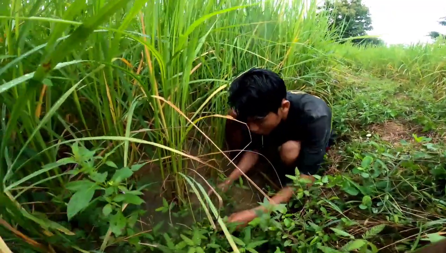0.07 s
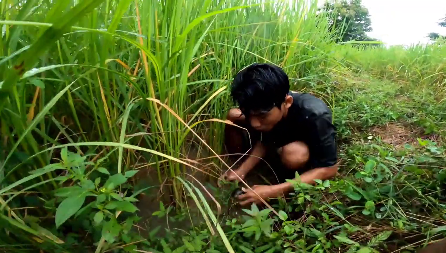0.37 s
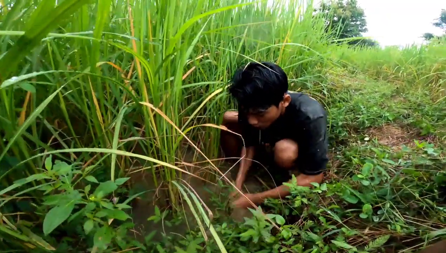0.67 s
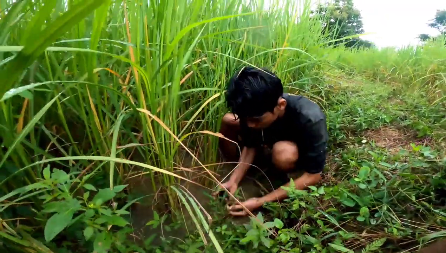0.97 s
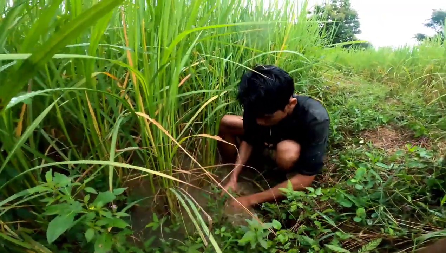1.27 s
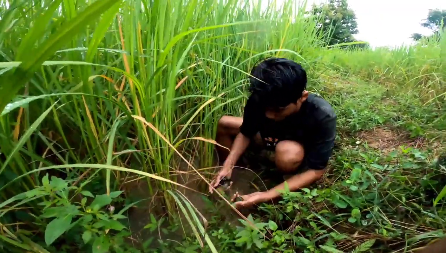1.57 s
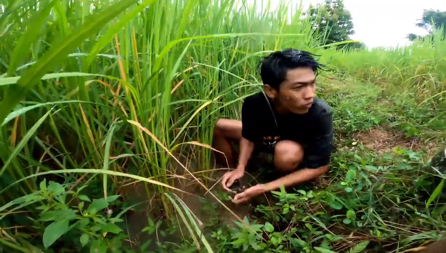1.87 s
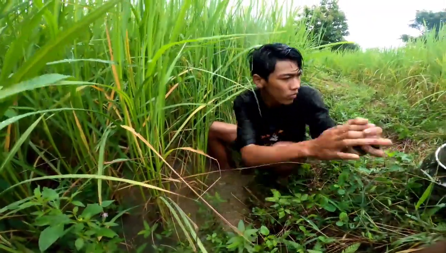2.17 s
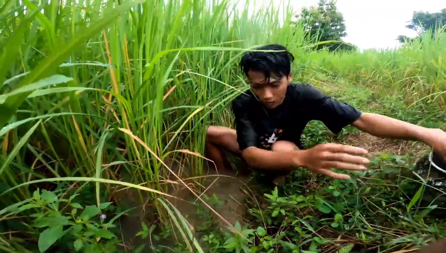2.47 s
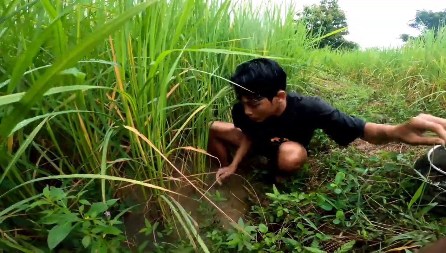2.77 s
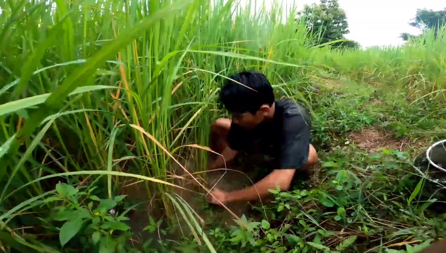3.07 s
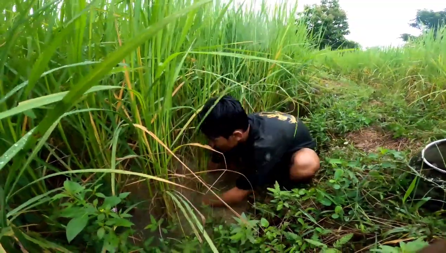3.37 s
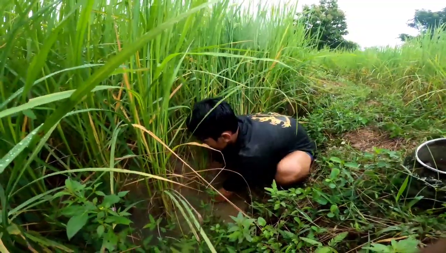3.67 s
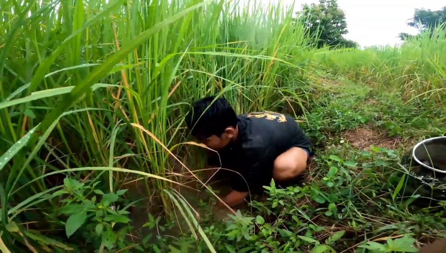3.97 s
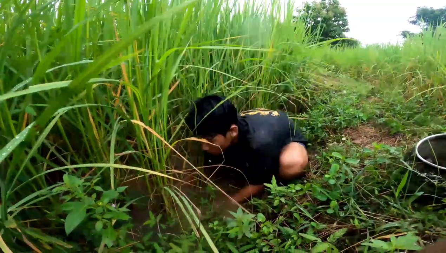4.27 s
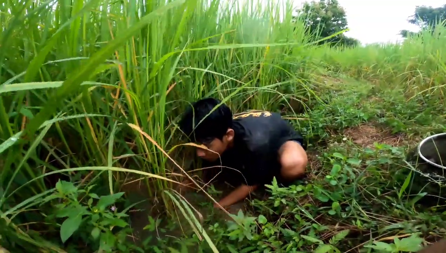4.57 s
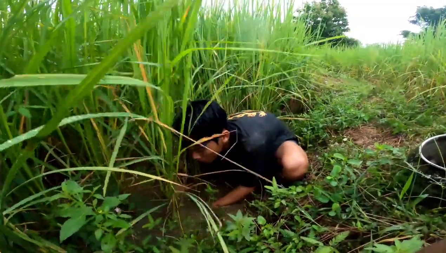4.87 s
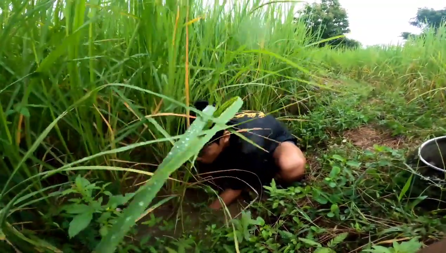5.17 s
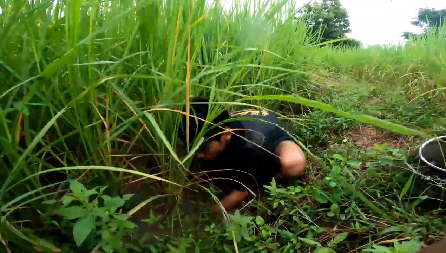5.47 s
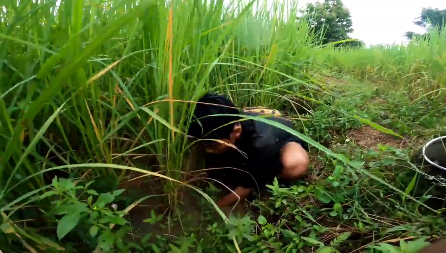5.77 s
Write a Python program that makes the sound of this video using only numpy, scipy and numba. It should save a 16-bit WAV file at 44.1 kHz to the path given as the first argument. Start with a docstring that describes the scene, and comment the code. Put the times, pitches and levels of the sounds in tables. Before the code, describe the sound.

Wet splashes and gurgles of hands groping in a shallow ditch, with a brief tumble in a plastic bucket and soft brushing leaves.

```python
"""Groping in a rice-field ditch

Hands slosh, drip and smack in muddy water, ringing the bubbles they trap; a trickle runs in on the left.
A hard little catch hits the wall of a plastic bucket, then tumbles and rolls on its drumming base.
Rice leaves brush and hiss close by, over a faint far drone and low puffs of breeze."""
import sys
import numpy as np
from scipy import signal
from scipy.fft import rfft, irfft
from scipy.io import wavfile
from numba import njit

SR = 44100
rng = np.random.default_rng(int(sys.argv[2]) if len(sys.argv) > 2 else 0)


def persist_wave(psi):
    """Save psi, clipped to +-1, as 16-bit WAV."""
    counts = np.round(np.clip(psi, -1, 1) * 32767).astype(np.int16)
    wavfile.write(sys.argv[1], SR, np.atleast_2d(counts).T)


N = 261513

# EQ of the trickling water. Each row: frequency in Hz, gain in dB.
STREAM_EQ = [(250, -6), (450, -9), (700, -1.5), (900, -2), (1280, 7.5), (1600, 1), (2500, 1.5),
             (4000, -0.5), (4700, -5), (8000, -17), (14000, -20)]
# Hands stir the water. Each row: start and length in seconds, level in dB, middle bubble pitch in Hz.
HAND_PUSHES = [(0.112, 0.014, -39.5, 1485), (0.238, 0.0066, -42.5, 850), (0.46, 0.06, -36.5, 2075),
               (0.64, 0.012, -38, 713), (0.644, 0.016, -29, 3220), (0.682, 0.052, -30.5, 1234),
               (0.74, 0.039, -25, 1457), (0.854, 0.022, -37.5, 880), (0.942, 0.21, -42.5, 2250),
               (1.395, 0.042, -32, 3500), (1.451, 0.037, -30.5, 1624), (1.497, 0.032, -29, 1415),
               (1.538, 0.063, -34, 2030), (1.681, 0.044, -40, 1790), (2.17, 0.4, -41, 996),
               (3.072, 0.032, -39.5, 2160), (3.183, 0.028, -32, 1985), (3.389, 0.035, -36.5, 2170),
               (4.664, 0.036, -43, 597)]
# The bucket's modes. Each row: pitch in Hz, level in dB when struck on the base, and on the wall.
BUCKET_MODES = [(341, -12, -4.5), (642, -5.5, -24), (963, 0.5, -9.5), (1002, -1.5, -18), (1405, -20, 1.5),
                (1520, -5, -16), (1773, 2, -19), (1948, 4, -7), (2226, -9, 2.5), (2380, -2, -0.5),
                (2620, -25, -6), (2930, -6, -22), (3470, -18, 6), (3716, -1, 3.5), (5160, -9, 5.5),
                (7070, -38, 3)]
# EQ of shell cracking against plastic. Each row: frequency in Hz, gain in dB.
CRACK_EQ = [(150, -14.5), (400, -0.5), (800, -4.5), (1400, -4), (3700, 5), (4500, -14), (5400, -8.5),
            (9000, -14.5), (11000, -23.5), (15000, -42)]


def undb(db):
    """Decibels to gain."""
    return 10 ** (np.asarray(db) / 20)


def unit(x):
    """Scale to rms 1."""
    return x / np.sqrt(np.mean(x ** 2) + 1e-18)


def curve(rows):
    """Gain at every sample from (s, dB) rows."""
    return undb(np.interp(np.arange(N) / SR, *np.transpose(rows)))


def swells(rows):
    """Gain at every sample from bell-shaped swells (peak time s, half length s, dB)."""
    t = np.arange(N) / SR
    return sum(undb(db) * np.exp(-((t - s) / half) ** 2) for s, half, db in rows)


def walk(rate):
    """Random drift with a spread near 1, turning rate times a second."""
    return np.interp(np.arange(N) / SR * rate, np.arange(N), rng.standard_normal(N))


def add(out, s, x):
    """Mix x into out from time s on."""
    i = max(int(s * SR), 0)
    out[..., i:i + x.shape[-1]] += x[..., :max(N - i, 0)]


def eq(x, points, size=2048):
    """Minimum-phase EQ through (Hz, dB) points."""
    hz, db = np.transpose(points)
    log_hz = np.log(np.fft.rfftfreq(size, 1 / SR) + 1)
    log_gain = np.log(undb(np.interp(log_hz, np.log(hz), db)))
    cepstrum = irfft(log_gain)[:size // 2]
    cepstrum[1:] *= 2
    response = irfft(np.exp(rfft(cepstrum, size))).reshape((1,) * (x.ndim - 1) + (-1,))
    return signal.fftconvolve(x, response, axes=-1)[..., :x.shape[-1]]


def lowpass(x, hz, order=1):
    """Gentle treble cut."""
    return signal.sosfilt(signal.butter(order, min(hz, SR / 2 - 100), fs=SR, output="sos"), x)


@njit
def bubbles(length, start, hz, cycles, size, rise):
    """Ringing bubbles; each dies away over its cycles while its pitch climbs by the fraction rise."""
    out = np.zeros(length)
    for k in range(len(start)):
        n, first, phase = int(cycles[k] / hz[k] * SR) + 2, int(start[k] * SR), 0.
        for i in range(min(n, length - first)):
            age = i / n
            phase += 2 * np.pi * hz[k] * (1 + rise * age) / SR
            out[first + i] += size[k] * np.sin(phase) * np.exp(-5 * age) * (1 - np.exp(-25 * age))
    return out


def ragged(hz, rough, flutter_hz):
    """A tone along a pitch curve, fluttering in strength and phase."""
    t = np.arange(len(hz)) / SR
    wobble, smear = (np.interp(t * flutter_hz, np.arange(200), row)
                     for row in rng.standard_normal((2, 200)))
    phase = 2 * np.pi * np.cumsum(hz) / SR
    tone = (1 + rough * wobble) * np.sin(phase) + rough * smear * np.cos(phase)
    return tone / np.sqrt(1 + rough ** 2)


def plip(hz, t60, ring_db, spray_db):
    """One wet impact: a rising ring and a burst of bright spray that die together."""
    t = np.arange(SR // 12) / SR
    ring = undb(ring_db) * np.sin(2 * np.pi * hz * t * (1 + 6 * t))
    spray = undb(spray_db) * rng.standard_normal(len(t))
    envelope = undb(-60 * t / t60) * (1 - np.exp(-t / 0.00022))
    return envelope * (ring + spray - lowpass(spray, hz / 2))


def place(x, left_db, lag_ms, scatter_db, scatter_t60, blur_hz):
    """Pan the treble, delay the left by lag_ms and add bright scatter off bank and stalks."""
    hz = np.fft.rfftfreq(N + SR, 1 / SR)
    t = np.arange(SR // 8) / SR
    tail = rng.standard_normal((2, len(t))) * undb(-60 * t / scatter_t60) * (t > .001)
    scatter = rfft(unit(tail), N + SR) / np.sqrt(len(t)) * undb(scatter_db) * hz / np.hypot(hz, blur_hz)
    direct = np.exp(-2j * np.pi * hz * np.array([[lag_ms / 1000], [0]]))
    shade = undb(np.array([[left_db], [-left_db]]) / 2 * hz / np.hypot(hz, 700))
    return irfft(rfft(x, N + SR) * (direct + scatter) * shade, N + SR)[:, :N]


def air():
    """A far, throbbing drone and rumbling puffs of breeze."""
    # EQ of the far rumble. Each row: frequency in Hz, gain in dB.
    far_eq = [(15, -12), (45, 1), (80, -0.5), (115, 1), (150, -1), (200, 2), (280, -9), (500, -5),
              (1200, -42)]
    # Puffs of breeze. Each row: peak time and half length in seconds, level in dB.
    puffs = [(4.58, 0.093, -43), (5.722, 0.21, -48)]
    t = np.arange(N) / SR
    rumble = eq(rng.standard_normal(N) + 0.29 * rng.standard_normal((2, N)), far_eq)
    drone = np.sin(2 * np.pi * 149 * t + 1.5 * walk(30))
    throb = 1 + 0.54 * np.sin(2 * np.pi * 21 * t + 2.0 * walk(5.5))
    breeze = unit(lowpass(rng.standard_normal(N) + 0.33 * rng.standard_normal((2, N)), 41, order=2))
    return (undb(-54) * unit(rumble) + undb(-54.5) * drone) * throb + breeze * swells(puffs)


def leaves(count=150, rest_db=-50):
    """Rice blades brush each other on both sides: a fine hiss, and crisp ticks that grow with it."""
    # EQ of the hiss. Each row: frequency in Hz, gain in dB.
    leaf_eq = [(400, -11.5), (1500, -1), (3500, 1), (6000, -2), (9000, -5.5), (10500, -10), (13000, -11.5),
               (15500, -39)]
    # An arm sweeps through the blades. Each row: peak time and half length in seconds, level in dB.
    swishes = [(2.42, 0.16, -51.5), (3.5, 0.21, -49), (4.45, 0.22, -51), (5.05, 0.41, -48),
               (5.85, 0.53, -54.5)]
    grain = rng.standard_normal((2, N)) * undb(4.1 * rng.standard_normal((2, N)))
    hiss = unit(eq(grain, leaf_eq)) * undb(1.74 * walk(35))
    when, pitch, size, side = rng.random((count, 4)).T
    hz = 2200 * 2 ** (2.5 * pitch)
    gain = undb(5 + 19 * size ** 3 - 6 * pitch)
    ticks = [bubbles(N, when * N / SR, hz, 4 + 4 * pitch, gain * np.sqrt(share), rise=0.)
             for share in (side, 1 - side)]
    return (hiss + np.array(ticks)) * (undb(rest_db) + swells(swishes))


def fizz(count=14000):
    """A soft wash of tiny, short-lived bubbles."""
    when, life, pitch, size = rng.random((count, 4)).T
    hz = 560 * 2 ** (4.3 * pitch)
    gain = undb(-2.4 * np.log(size + .01)) * 2 ** (2.4 * pitch)
    return unit(eq(bubbles(N, when * N / SR, hz, 7 + 20 * life, gain, rise=0.13), STREAM_EQ))


def trickle(count=260):
    """Water runs in on the left in small gulps: gliding bubbles over fizz, with wide, bright spatter."""
    # The flow swells and ebbs. Each row: time in seconds, level in dB.
    flow = [(0.0, -42), (0.86, -40), (1.2, -42.5), (1.52, -38), (1.91, -41.5), (2.5, -40.5),
            (2.95, -44), (3.44, -41.5), (3.83, -42), (5.02, -40.5), (5.37, -43), (5.93, -38.5)]
    when, life, pitch, size = rng.random((count, 4)).T
    hz = 430 * 2 ** (3 * pitch)
    gain = undb(9 * size ** 2 + 5 * pitch)
    babble = bubbles(N, when * N / SR, hz, 20 + 30 * life, gain, rise=0.3)
    water = undb(-9) * unit(eq(babble, STREAM_EQ)) + undb(-3) * fizz()
    wide_fizz = np.array([fizz(), fizz()])
    spatter = undb(-6.5) * (wide_fizz - lowpass(wide_fizz, 1530))
    pan = undb([[3.6], [-3.6]])
    return (water + spatter) * pan * curve(flow) * undb(1.4 * walk(30))


def gurgles():
    """Large bubbles swell and break up, each on its own wandering glide; soft mud makes them flutter."""
    # Surfacing bubbles. Each row: start in seconds, level in dB, starting pitch in Hz,
    # length of the main swell in seconds, glide in octaves per second.
    glugs = [(.007, -32, 843, 0.052, 5.5), (0.036, -29.5, 1138, 0.037, -2), (0.522, -37, 413, 0.055, 12),
             (1.363, -28.5, 1245, 0.015, -2.5), (1.444, -23.5, 1348, 0.037, 6),
             (1.472, -26.5, 467, 0.018, 5.5), (1.508, -31, 471, 0.023, 6.5), (1.777, -37.5, 391, 0.064, 6),
             (2.193, -36.5, 481, 0.045, 10), (2.399, -29.5, 1153, 0.027, 12),
             (2.478, -38.5, 558, 0.045, -12), (2.515, -34.5, 487, 0.073, 9),
             (3.0796, -23.5, 1137, 0.02, 9.5), (3.176, -34.5, 372, 0.02, 13), (3.507, -36.5, 663, 0.022, 8),
             (4.284, -37, 824, 0.029, 14), (4.311, -29.5, 1154, 0.013, 18), (4.502, -38, 1140, 0.034, 10.5),
             (4.868, -30.5, 1275, 0.011, -3), (5.044, -31.5, 1126, 0.016, 3), (5.254, -35, 697, 0.022, 9.5),
             (5.317, -31, 1238, 0.018, -5), (5.484, -36, 1130, 0.021, -8.5), (5.409, -35.5, 1090, 0.026, 6),
             (5.479, -40, 455, 0.031, 10), (5.612, -34, 498, 0.022, 9.5), (5.899, -29.5, 1320, 0.008, 6)]
    out = np.zeros(N)
    for s, db, hz, length, glide in glugs:
        t = np.arange(int(2 * length * SR)) / SR
        age = t / length / 0.3
        swell = age * np.exp(1 - age)
        wander = .07 * walk(110)[:len(t)]
        add(out, s, undb(db) * swell * ragged(hz * 2 ** (glide * t + wander), rough=.5, flutter_hz=200))
    return out


def crackles(count=6, spread_s=0.0067):
    """Wet stalks and mud crackle under the fingers, each time in a quick handful of ticks."""
    # Clusters of ticks. Each row: start in seconds, level in dB.
    clusters = [(3.405, -26.5), (4.283, -27), (4.43, -27.5), (4.453, -29), (4.903, -27), (5.16, -28.5),
                (5.184, -28), (5.198, -28), (5.292, -28.5), (5.781, -30)]
    s, db = np.transpose(clusters)[:, :, None]
    when, pitch, size = rng.random((len(s), count, 3)).transpose(2, 0, 1)
    start = s + when * spread_s
    hz = 1700 * 2 ** (1.3 * pitch)
    gain = undb(db) * (.5 + size)
    return bubbles(N, start.ravel(), hz.ravel(), 8 + 10 * size.ravel(), gain.ravel(), rise=0.)


def plunges(overtone_ratio=2.8):
    """The air pocket behind a plunging hand gulps down in pitch as it deepens, on two resonances."""
    # Air pockets. Each row: start and length in seconds, level in dB, first and last pitch in Hz.
    pockets = [(1.41, .085, -34.5, 1595, 477.3)]
    out = np.zeros(N)
    for s, length, db, first_hz, last_hz in pockets:
        n = int(length * SR)
        depth = np.linspace(0, 1, n)
        hz = first_hz * (last_hz / first_hz) ** depth * 2 ** (.13 * walk(90)[:n])
        gulp = ragged(hz, rough=1.6, flutter_hz=450)
        overtone = undb(-5) * ragged(hz * overtone_ratio, rough=2, flutter_hz=700)
        jerks = unit(undb(4.5 * walk(160)[:n]))
        add(out, s, undb(db) * signal.windows.tukey(n, .15) * jerks * (gulp + overtone))
    return out


def sloshes(bubbles_per_s=2400):
    """Each push of a hand traps separate bubbles, more the longer it lasts, and throws fine spray."""
    out = np.zeros(N)
    for s, length, db, middle_hz in HAND_PUSHES:
        t = np.arange(int((length + 0.02) * SR)) / SR
        count = 10 + int(length * bubbles_per_s)
        when, life = rng.random((SR // 20, 2))[:count].T
        pitch, size = rng.standard_normal((SR // 20, 2))[:count].T
        hz = np.clip(middle_hz * 2 ** (.8 * pitch), 200, 13000)
        gain = undb(7.3 * np.minimum(size, 1.7)) * (hz / middle_hz) ** -.05 * (hz > 400)
        cloud = bubbles(len(t), when * length, hz, 6 + 20 * life, gain, rise=0.24)
        spray = rng.standard_normal(SR)[:len(t)] * np.exp(-np.maximum(t - length, 0) / 0.01)
        level = undb(db) * np.sqrt(len(t) / SR / length)
        add(out, s, level * (unit(cloud) + undb(-8.5) * unit(spray)))
    return out


def droplets(count=4):
    """Each slosh flings a few fine droplets, which land with crisp ticks."""
    s, length, db, _ = np.transpose(HAND_PUSHES)[:, :, None]
    when, pitch, size = rng.random((len(s), count, 3)).transpose(2, 0, 1)
    start = s + when * (length + .025)
    hz = 6000 + 8000 * pitch
    gain = undb(db + 10.5 + 17 * size ** 2)
    return bubbles(N, start.ravel(), hz.ravel(), 3 + 4 * size.ravel(), gain.ravel(), rise=0.)


def drops():
    """Drops fall from the hands; each smacks the surface and rings one small bubble."""
    # Drips. Each row: start in seconds, level in dB, starting pitch in Hz, 60 dB decay in seconds.
    drips = [(0.105, -26, 3800, 0.017), (0.6323, -14, 2470, 0.0089), (0.6493, -13, 3750, 0.011),
             (0.6666, -14, 1320, 0.021), (0.681, -16, 950, 0.016), (0.7255, -14.5, 3630, 0.0089),
             (0.747, -14, 710, 0.023), (0.768, -16, 1280, 0.023), (0.8587, -23, 3480, 0.02),
             (0.989, -22, 1370, 0.05), (1.3948, -10, 2670, 0.01), (1.4606, -20, 2250, 0.022),
             (1.9737, -6, 3260, 0.0029), (2.077, -23.5, 2600, 0.012), (2.1082, -17.5, 2550, 0.015),
             (2.109, -15.5, 1410, 0.011), (2.158, -22, 1320, 0.014), (2.183, -13.5, 2330, 0.008),
             (2.1835, -19.5, 1600, 0.016), (2.2509, -14, 2400, 0.0063), (2.358, -19, 915, 0.037),
             (3.3247, -21.5, 1420, 0.018), (3.586, -12.5, 1670, 0.0029), (4.151, -21.5, 3220, 0.0074),
             (4.704, -20, 1220, 0.007), (4.8545, -20, 1200, 0.014), (5.581, -26.5, 3970, 0.013)]
    out = np.zeros(N)
    for s, db, hz, t60 in drips:
        add(out, s, undb(db) * plip(hz, t60, ring_db=4, spray_db=-10))
    return out


def smacks():
    """Wet mud snaps as it lets go of the fingers: mostly spray, with little ring."""
    # The mud lets go. Each row: start in seconds, level in dB.
    releases = [(0.6318, -7), (0.8252, -19), (0.876, -13.5), (0.944, -21.5), (1.3943, -11.5), (1.5187, -17),
                (1.9718, -21.5), (2.2473, -15.5), (3.1843, -17.5), (3.207, -16.5), (4.787, -31)]
    out = np.zeros(N)
    for s, db in releases:
        add(out, s, undb(db) * plip(hz=2460, t60=0.013, ring_db=-16, spray_db=3))
    return out


def roll(start_s=2.745, stop_s=2.89, attack_s=0.12, release_t60=0.031, knocks_per_s=900):
    """The rolling shell keeps the base ringing with tiny knocks; its weight damps the high modes."""
    t = np.arange(SR // 10) / SR
    ring = sum((-1) ** k * undb(db - 60 * t / min(.06, 80 / hz)) * np.sin(2 * np.pi * hz * t)
               for k, (hz, db, _) in enumerate(BUCKET_MODES))
    knocks = rng.standard_normal(N) * (rng.random(N) < knocks_per_s / SR)
    body = unit(lowpass(signal.fftconvolve(knocks, ring)[:N], 4100, order=2))
    scuff = unit(lowpass(eq(knocks, CRACK_EQ), 2260))
    now = np.arange(N) / SR
    attack = np.clip((now - start_s) / attack_s, 0, 1)
    release = undb(-60 * np.maximum(now - stop_s, 0) / release_t60)
    return undb(-29.5) * (.6 * body + scuff) * attack * release


def bucket_ring(t, wall):
    """Plastic damps high modes fast; on the base the catch loads them, differently at every touch."""
    hz, base_db, wall_db = np.transpose(BUCKET_MODES)[:, :, None]
    jitter, detune, polarity = rng.standard_normal((3, len(BUCKET_MODES), 1))
    base = 1 - wall
    t60 = np.minimum(.17, .135 * np.sqrt(1400 / hz)) * np.minimum(1, 1400 / hz) ** (.8 * base)
    pitch = hz * (1 + .04 * base * np.minimum(1, hz / 2600) * detune)
    modes_db = base_db + wall * (wall_db - base_db) + 3 * base * jitter - 60 * t / t60
    return np.sum(np.sign(polarity) * undb(modes_db) * np.sin(2 * np.pi * pitch * t), axis=0)


def chatter(t, touch_t60=0.0087, tail_t60=0.099):
    """The catch touches several times in one bounce: a stuttering crack with a short tail."""
    # Contacts. Each row: delay after the first touch in seconds, level in dB.
    touches = [(0, 4), (.0022, -4), (.0065, -21), (0.011, -22)]
    bursts = sum((t >= lag) * undb(db - 60 * np.abs(t - lag) / touch_t60) for lag, db in touches)
    tail = undb(-8.5 - 60 * t / tail_t60)
    return eq(rng.standard_normal(len(t)) * (bursts + tail), CRACK_EQ)


def base_thud(t, attack_s=0.0071):
    """The flexing base drums with a wavering pitch, and the air in the bucket hums on."""
    # Low resonances. Each row: pitch in Hz, 60 dB decay in seconds, level in dB.
    drum_modes = [(330, 0.05, -7), (375.5, 0.031, 2), (355, 0.11, -9)]
    bent_time = np.cumsum(1 + .035 * walk(70)[:len(t)]) / SR
    drum = sum(undb(db - 60 * t / t60) * np.sin(2 * np.pi * hz * bent_time) for hz, t60, db in drum_modes)
    return drum * (1 - np.exp(-t / attack_s))


def bounces(patch_t60=0.065, snap_t60=0.032):
    """Each bounce rings the bucket and the struck patch, drums the base and flicks water off the catch."""
    # Hits. Each row: start in seconds, level in dB, position from base (0) to wall (1), treble cutoff
    # in Hz, pitch of the struck patch in Hz, then levels of patch, thud and wet snap in dB.
    hits = [(2.6151, -17, 1, 12000, 3440, -24, -59, -14),
            (2.7135, -19.5, 0.022, 3360, 2680, -25, -25.5, -45),
            (2.7461, -17.5, 0.13, 2200, 1370, -15.5, -36, -42),
            (2.763, -27, 0.13, 3000, 1530, -32, -29, -26.5),
            (2.7929, -14.5, 0.089, 1010, 982, -20.5, -8, -35),
            (2.823, -26, 0.94, 3000, 2730, -32, -21.5, -28),
            (2.834, -22, 0.23, 2600, 2440, -21, -19.5, -29), (2.87, -20, 0.23, 5000, 3520, -24, -27.5, -38),
            (2.89, -31, 0.3, 2000, 980, -44, -24, -45), (2.971, -36, 0.4, 1200, 560, -38, -37.5, -56)]
    # EQ of fine spray. Each row: frequency in Hz, gain in dB.
    spray_eq = [(1500, -34), (5000, 7), (7600, 2), (11000, -14), (15500, -30)]
    out, t = np.zeros(N), np.arange(SR // 4) / SR
    attack = 1 - np.exp(-t / 0.00046)
    for s, db, wall, cutoff_hz, patch_hz, patch_db, thud_db, snap_db in hits:
        knock = undb(db) * lowpass(0.46 * bucket_ring(t, wall) + 2.83 * chatter(t), cutoff_hz)
        patch = ragged(np.full(len(t), patch_hz), rough=.6, flutter_hz=300)
        patch *= undb(patch_db - 60 * t / patch_t60)
        thud = -2.9 * undb(thud_db) * base_thud(t)
        snap = eq(rng.standard_normal(len(t)) * undb(snap_db - 60 * t / snap_t60), spray_eq)
        add(out, s, (knock + patch) * attack + snap + thud)
    return out


def scene():
    """Stream on the left, hands in front, bucket just to the right, leaves and air all around."""
    # EQ of the splashes. Each row: frequency in Hz, gain in dB.
    splash_eq = [(120, -10), (380, -2.5), (1000, -7), (2500, -2.5), (4000, 0), (4600, -4.5), (7500, -10),
                 (9200, -7.5), (10500, -16), (15000, -26)]
    glugs = place(gurgles(), left_db=8, lag_ms=0.014, scatter_db=-11, scatter_t60=0.04, blur_hz=2000)
    water = plunges() + crackles() + eq(sloshes() + drops() + smacks() + droplets(), splash_eq)
    hands = place(water, left_db=1, lag_ms=0.033, scatter_db=-1, scatter_t60=0.067, blur_hz=5360)
    tumble = bounces() + roll()
    bucket = place(tumble, left_db=-1, lag_ms=0.069, scatter_db=-0.5, scatter_t60=0.016, blur_hz=4460)
    return trickle() + glugs + hands + bucket + leaves() + air()


def record(dry, top_hz=15400):
    """A steep low-pass takes off the very top."""
    return signal.sosfilt(signal.ellip(8, .2, 70, top_hz, fs=SR, output="sos"), dry)


dry = scene()
out = record(dry)
persist_wave(out)
```